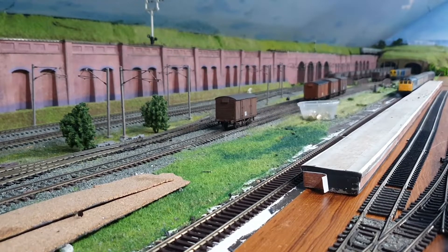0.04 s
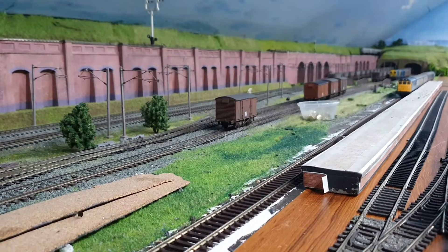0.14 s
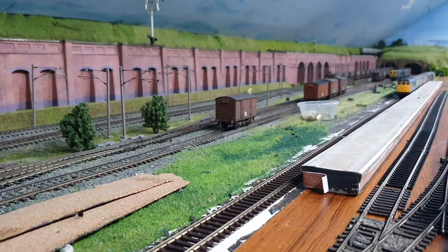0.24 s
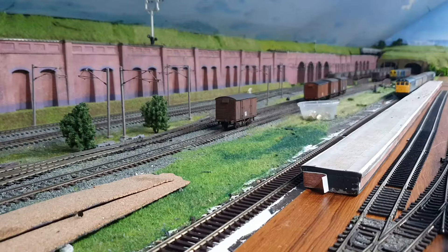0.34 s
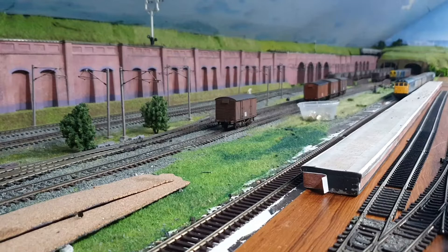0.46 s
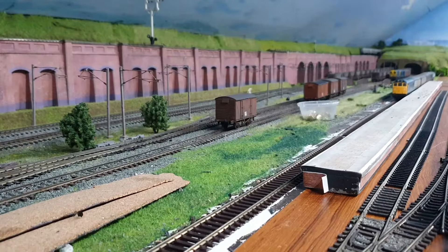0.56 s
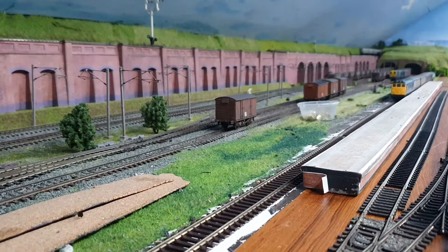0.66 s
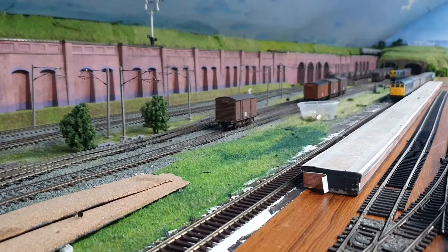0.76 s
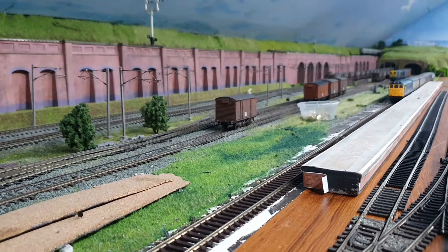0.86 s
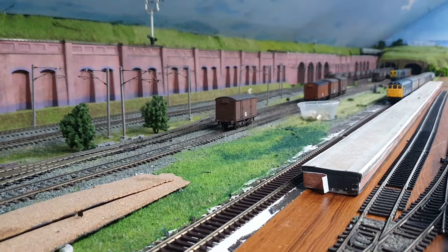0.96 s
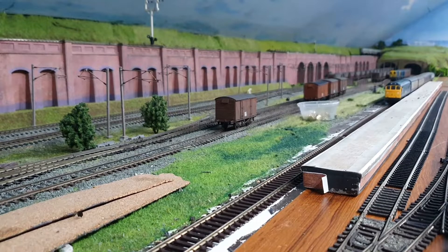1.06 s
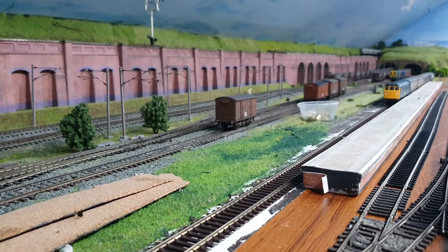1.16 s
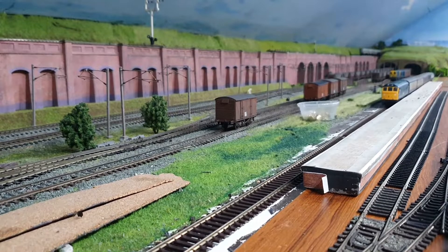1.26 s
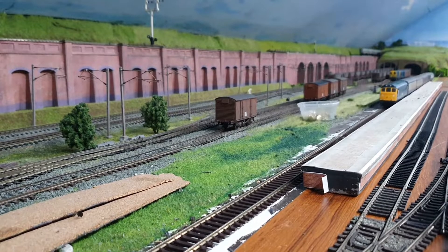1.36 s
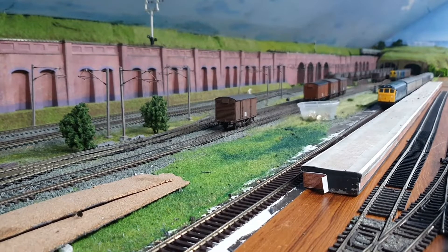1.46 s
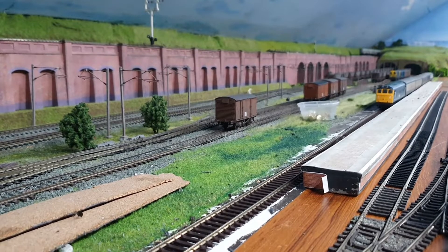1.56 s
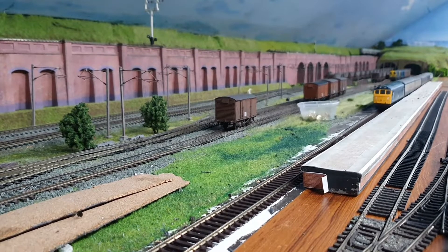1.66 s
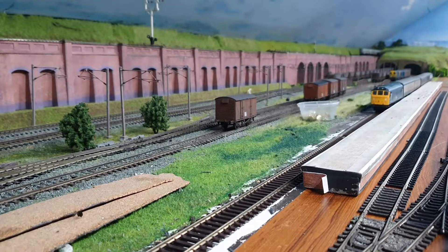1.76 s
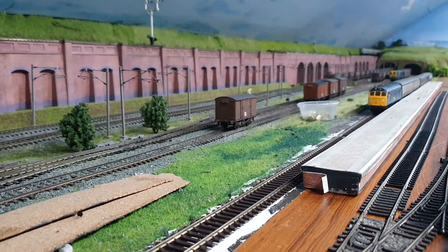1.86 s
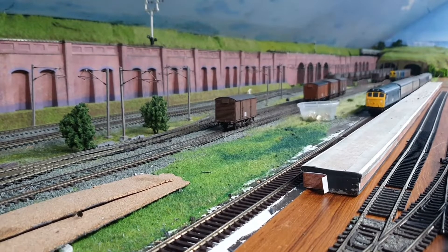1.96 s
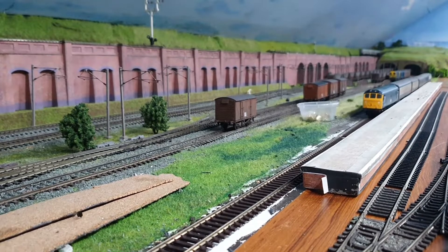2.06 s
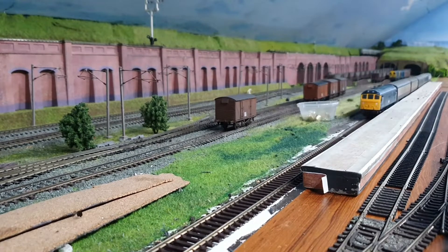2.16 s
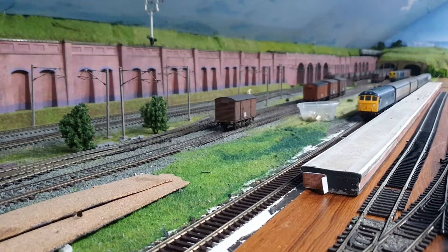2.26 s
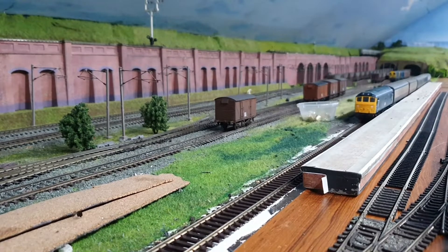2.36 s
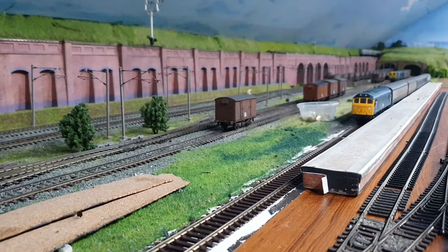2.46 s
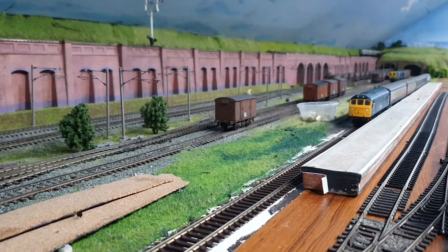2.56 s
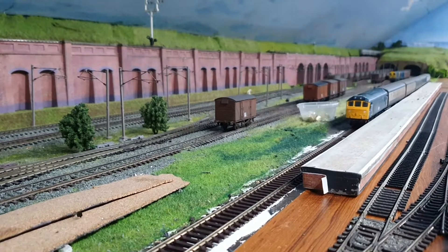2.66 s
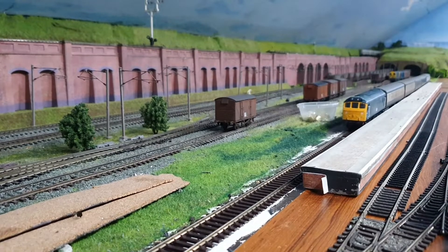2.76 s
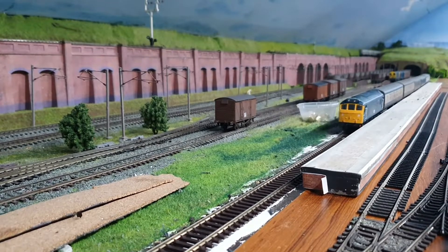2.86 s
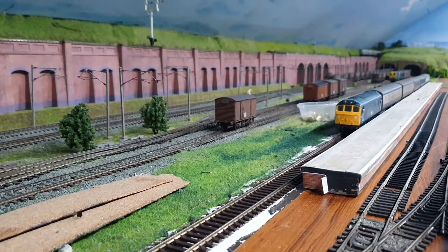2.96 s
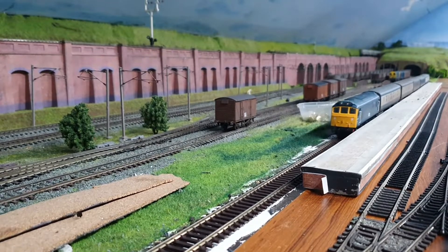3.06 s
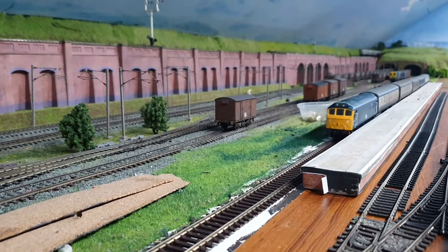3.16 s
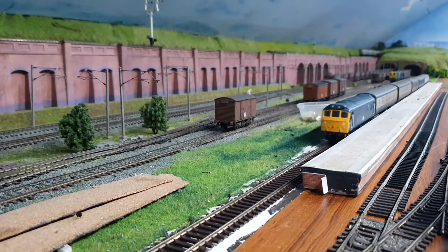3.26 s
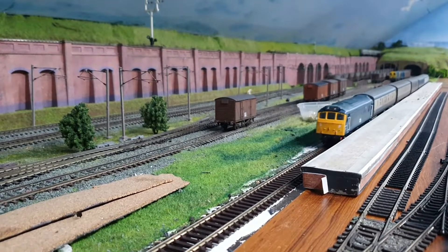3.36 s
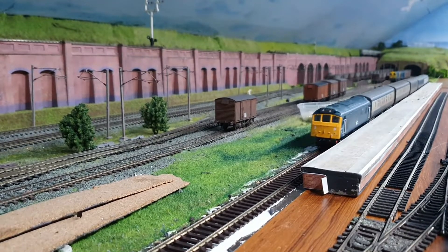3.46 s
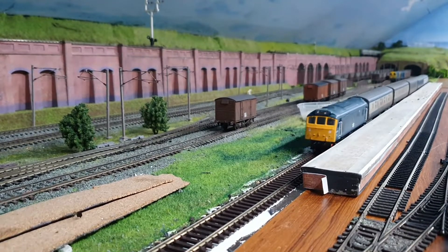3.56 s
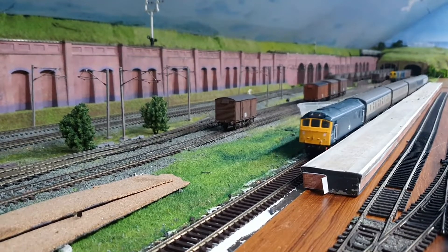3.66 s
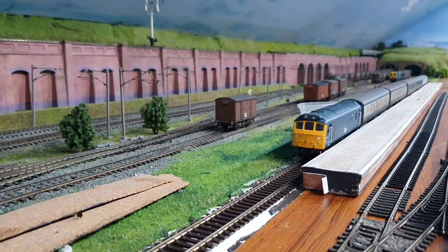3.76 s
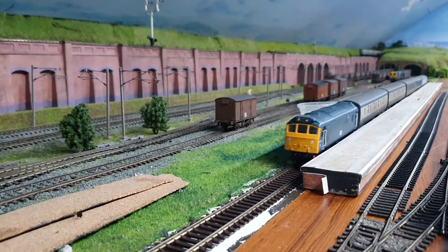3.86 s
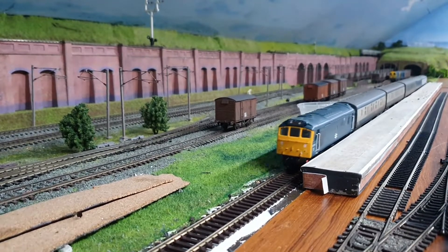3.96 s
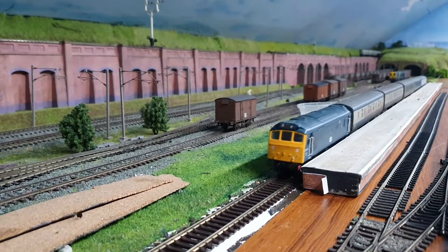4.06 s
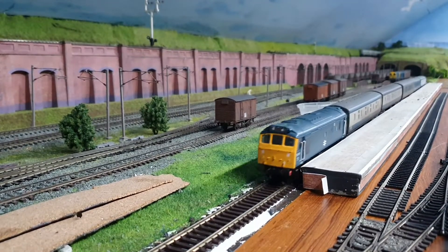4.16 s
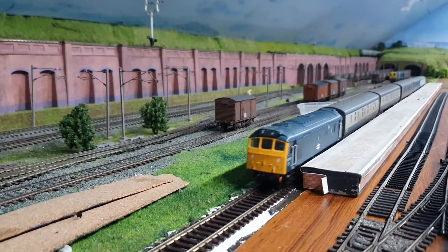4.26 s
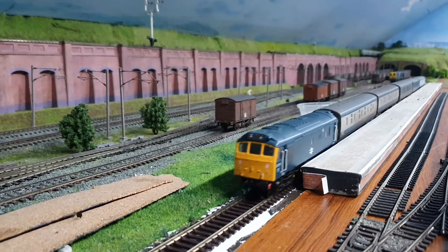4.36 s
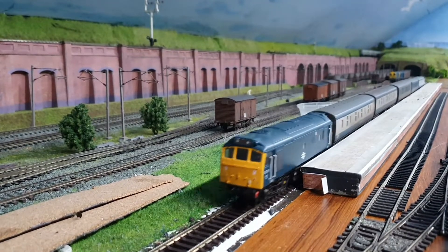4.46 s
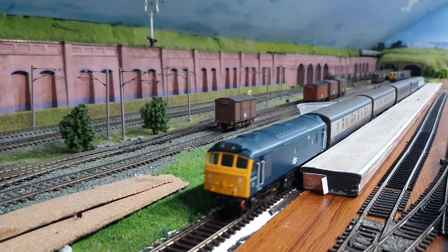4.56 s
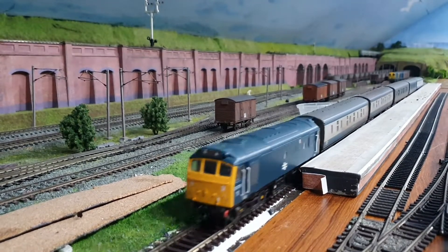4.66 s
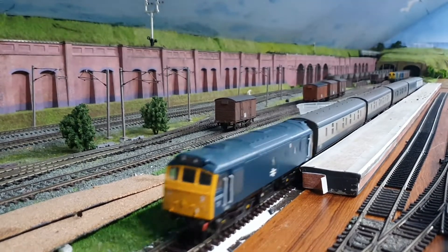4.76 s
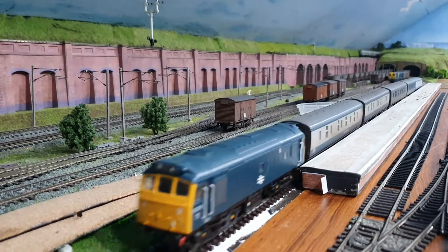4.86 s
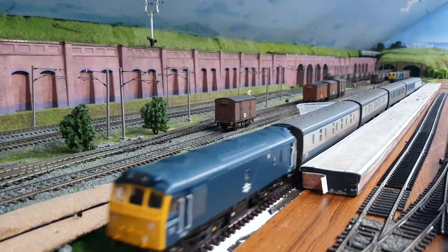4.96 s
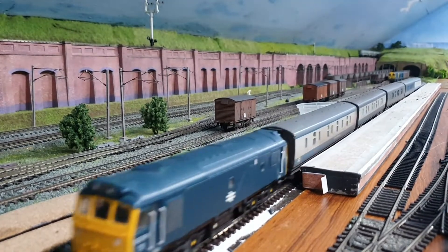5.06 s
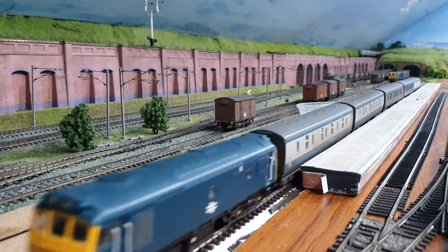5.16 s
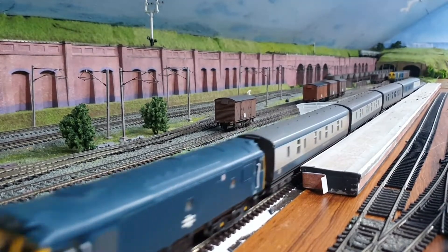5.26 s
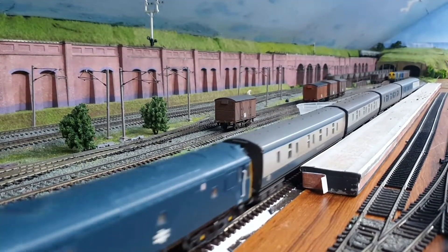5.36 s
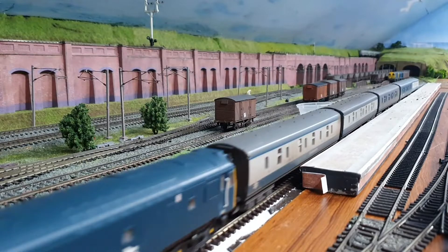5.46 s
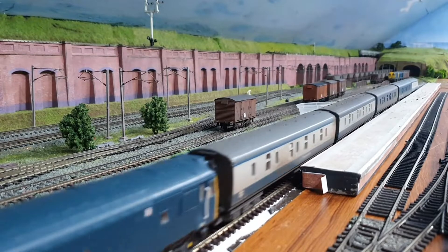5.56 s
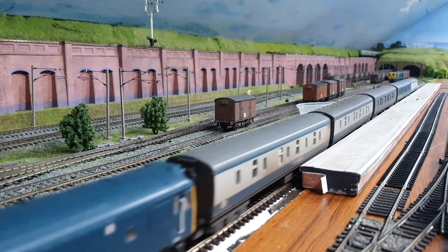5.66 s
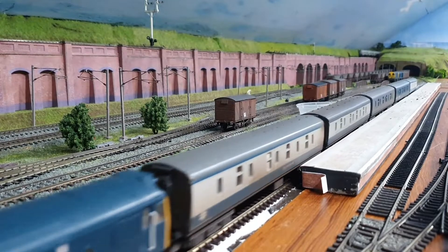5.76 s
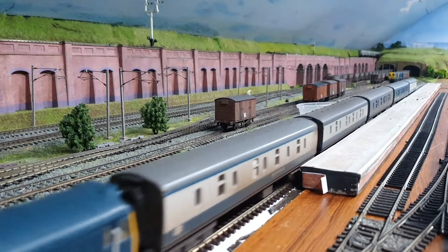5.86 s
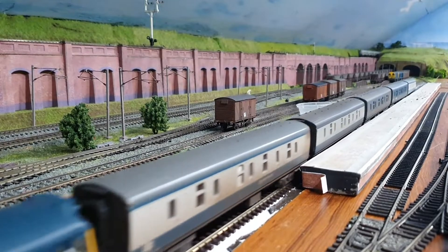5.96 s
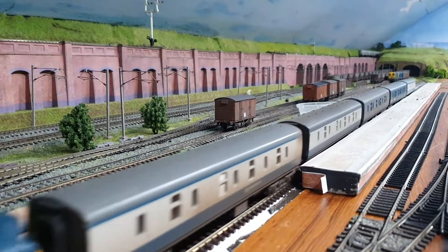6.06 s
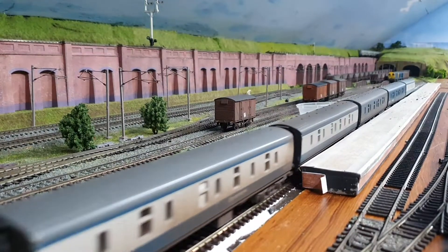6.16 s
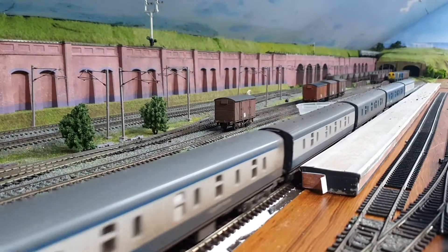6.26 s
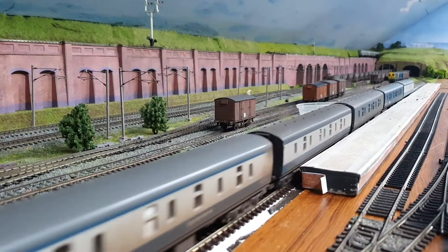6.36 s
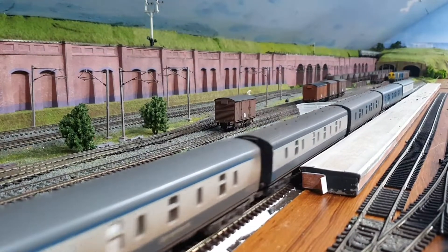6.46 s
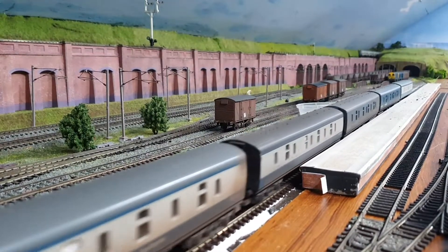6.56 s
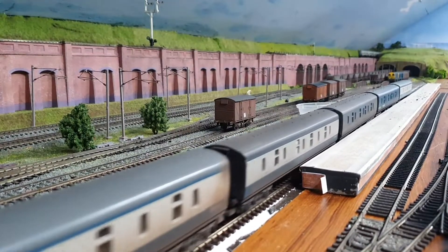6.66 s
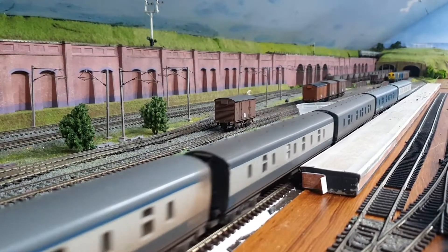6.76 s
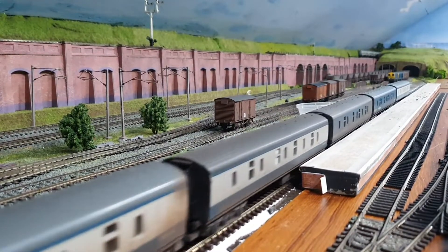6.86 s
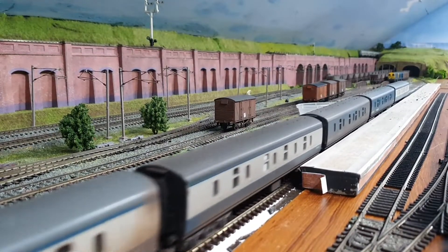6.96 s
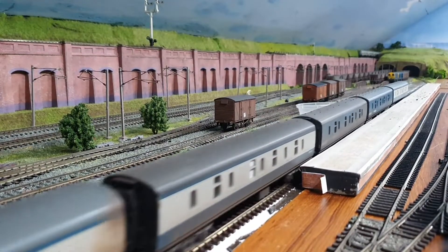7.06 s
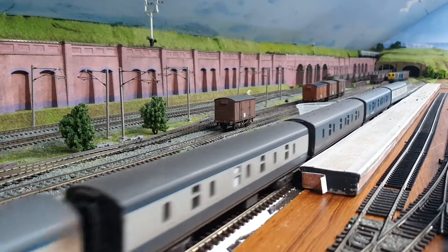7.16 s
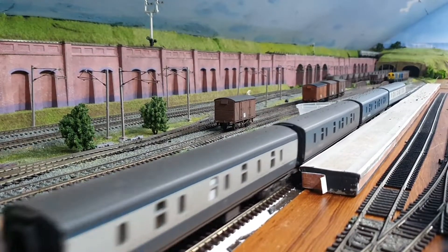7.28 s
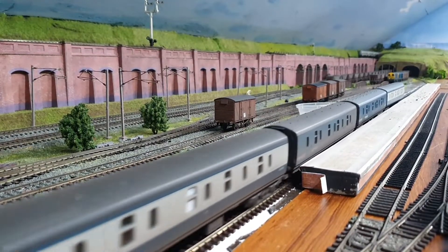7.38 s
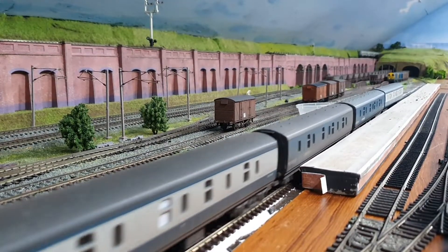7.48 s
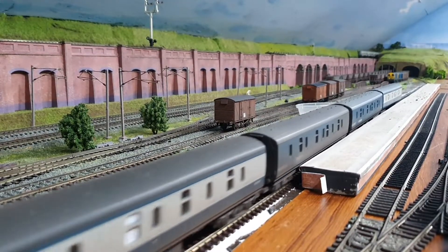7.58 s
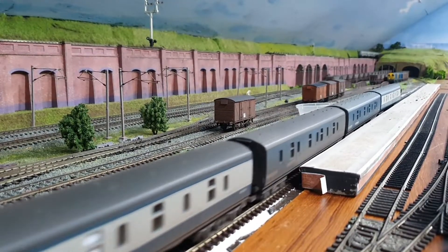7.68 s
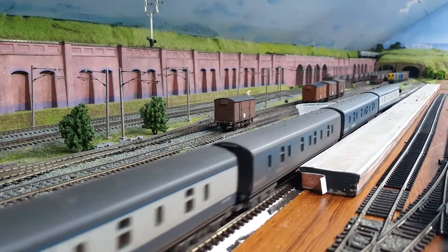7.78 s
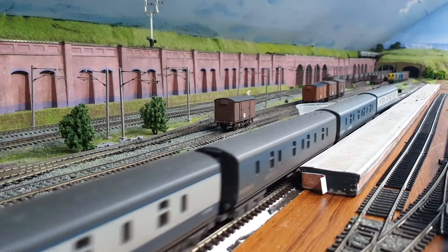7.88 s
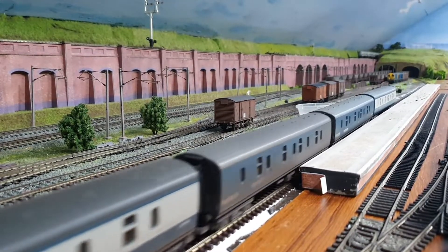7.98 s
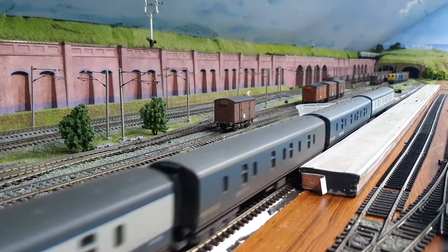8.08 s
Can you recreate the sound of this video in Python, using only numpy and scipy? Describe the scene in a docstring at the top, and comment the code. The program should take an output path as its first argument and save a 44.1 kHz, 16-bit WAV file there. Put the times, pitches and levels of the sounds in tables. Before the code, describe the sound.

A model diesel locomotive pulls coaches along a wooden baseboard in a small, short-echoed room, heard in stereo from beside the track. From 0 to 2 s it is distant: a blurred, steady gear rattle, about forty-six quick bursts per second limping in pairs, with a nasal motor whine and faint low rumble. From 2 to 4 s it grows clearer and louder; soft low thumps come through the board around 3 to 3.7 s, with a few hard clacks and a brief bright tone sliding downward near 3.7 s. Between 4.6 and 6.6 s it passes close, harsh and buzzing, with clusters of plastic clacks near 5.1 and 6.1 s, a throbbing low knock and a sweeping, hollow colour. After 6.5 s the drive weakens while coach wheels roll by with grainy clatter, fine hiss and tiny metallic ticks, still passing at 8 s.

```python
"""A wooden baseboard in a small room: a model diesel locomotive pulls coaches along it, from the far end
to just left of the microphone. Its gears rattle in six noise bursts per axle turn and ring the plastic body.
Filtered noise makes the board's rumble, rolling wheels and rail hiss; short bursts make ticks, clacks and
thumps. The room's echo wraps the far train; close by, a reflection with a moving delay sweeps the tone."""
import sys
import numpy as np
from scipy import signal
from scipy.fft import rfft, irfft
from scipy.io import wavfile
from scipy.ndimage import uniform_filter1d, map_coordinates

SR = 44100
rng = np.random.default_rng(int(sys.argv[2]) if len(sys.argv) > 2 else 0)


def unload_audio(sound):
    """Save the sound as a 16-bit wav file, at the path given as the first command line argument."""
    columns = np.transpose(np.atleast_2d(sound))
    # keep every value between -1 and 1, then stretch to whole-number steps
    steps = np.round(np.clip(columns, -1, 1) * 32767)
    wavfile.write(sys.argv[1], SR, steps.astype(np.int16))


N = 358091
TIME = np.arange(N) / SR


def gain_of(db):
    """Decibels to amplitude."""
    return 10 ** (np.asarray(db) / 20)


def size_of(seconds):
    """Seconds to samples."""
    return int(seconds * SR)


def unit_rms(x):
    """Scales to rms 1."""
    return x / np.sqrt(np.mean(x ** 2) + 1e-20)


def read_spectrum(points, hz):
    """Interpolates a spectrum on a log-frequency axis."""
    f, value = np.transpose(points)
    return np.interp(np.log(hz + 1), np.log(f + 1), value)


def follow(rows, t=TIME):
    """Interpolates each column of a curve at the times t."""
    s, *columns = np.transpose(rows)
    return [np.interp(t, s, c) for c in columns]


def add(mix, s, sound):
    """Adds a sound at s seconds, in place."""
    part = mix[max(round(s * SR), 0):][:len(sound)]
    part += sound[:len(part)]


def colour(x, points, modes=(), size=8192):
    """Minimum-phase filter: a broad spectrum with resonances standing on it; output at rms 1."""
    hz = abs(np.fft.fftfreq(size, 1 / SR))
    db = read_spectrum(points, hz)
    for centre_hz, width_hz, lift_db in modes:
        db = db + lift_db / (1 + (2 * (hz - centre_hz) / width_hz) ** 2)
    log_spectrum = np.conj(signal.hilbert(db * np.log(10) / 20))
    impulse = np.fft.ifft(np.exp(log_spectrum)).real
    return unit_rms(signal.oaconvolve(x, impulse[:size // 2])[:N])


def band(x, lo_hz, hi_hz, order=4):
    """Band-pass without delay."""
    sos = signal.butter(order, [lo_hz, hi_hz], "band", fs=SR, output="sos")
    return signal.sosfiltfilt(sos, x)


def lifted(x, hz, lift_db, width_hz):
    """Lifts a band whose centre follows hz: shift to 0 Hz, low-pass, shift back, add."""
    turn = np.exp(2j * np.pi * np.cumsum(hz) / SR)
    pole = np.exp(-np.pi * width_hz / SR)
    picked = 2 * (turn * signal.lfilter([1 - pole], [1, -pole], x / turn)).real
    return x + (gain_of(lift_db) - 1) * picked


def wander(hz):
    """Random drift: noise under a Gaussian low-pass, rms 1."""
    lowpass = np.exp(-(np.fft.rfftfreq(N, 1 / SR) / hz) ** 2)
    return unit_rms(irfft(rfft(rng.standard_normal(N)) * lowpass, N))


def grains(per_s):
    """Tiny impacts of random size at random moments."""
    return unit_rms(rng.standard_normal(N) * (rng.random(N) < per_s / SR))


def passing(at_s, spread_s, t=TIME):
    """Inverse-square swell of something passing at a steady speed: 1 when closest, 0 far away."""
    return 1 / (1 + ((t - at_s) / spread_s) ** 2)


# decay of the room: (frequency [Hz], t60 [s])
ROOM_DECAY = [(200, .22), (1000, .16), (2200, .1), (4000, .06), (12000, .04)]


def room(port_delay_s=0.00045, start_s=0.00273):
    """Decaying noise response at two close ports: alike in the bass, unrelated in the treble."""
    half_s = SR // 2
    taps = rng.standard_normal((2, half_s)) * (TIME[:half_s] > start_s)
    hz, t, z = signal.stft(taps, SR, nperseg=256)
    same = np.sinc(2 * hz * port_delay_s)[:, None]
    second = same * z[0] + np.sqrt(1 - same ** 2) * z[1]
    decay = gain_of(-60 * t / read_spectrum(ROOM_DECAY, hz)[:, None])
    tail = signal.istft(np.array([z[0], second]) * decay, SR)[1]
    return tail / np.linalg.norm(tail[0])


def reverberate(x, count=13):
    """Each stretch of track excites the room in its own way; the responses crossfade."""
    stretch, out = np.linspace(0, count - 1, N), np.zeros((2, N))
    for k in range(count):
        on = np.flatnonzero(abs(stretch - k) < 1)
        faded = x[on] * np.cos(np.pi / 2 * (stretch[on] - k))
        echo = signal.oaconvolve(faded[None], room(), axes=1)
        for ear, sound in zip(out, echo):
            add(ear, on[0] / SR, sound)
    return out


# the locomotive's place: (time [s], nearness [0-1], lead of the left ear in the mid range [ms])
PATH = [(0, 0.26, 0.053), (2, 0.4, 0.097), (3.5, 0.38, 0.2), (5.05, 0.57, 0.2), (5.5, 0.59, 0.62),
        (6.1, 1, .48), (7, 0.84, 0.47), (8.12, 0.83, 0.2)]
# change of colour from far to near: (frequency [Hz], level [dB])
NEAR_COLOUR_DB = [(220, -1), (300, 10), (430, -3.5), (580, -8), (700, -3.5), (860, 2), (1000, 0),
                  (1300, -9), (1800, -5.5), (2250, -7), (2700, -1), (4000, -2.5), (9000, 4), (14000, 3)]
# left minus right, far and near: (frequency [Hz], difference [dB])
FAR_BALANCE_DB = [(200, -35), (380, -6.5), (700, -6), (1290, -4.5), (2380, -2.5), (4400, -8.5), (6100, -4),
                  (7300, -28), (8500, -16), (15000, -6)]
NEAR_BALANCE_DB = [(200, 6), (380, 4), (700, -2.5), (1290, -3.5), (2380, -13.5), (4400, 3.5), (6200, 10),
                   (7300, -10.5), (8500, 18), (15000, 10)]
# wall reflection: delay far and longest, time of the longest, spread
WALL_FAR_MS, WALL_NEAR_MS, WALL_AT_S, WALL_SPREAD_S = 1.026, 2.55, 5.746, 1.94


def place(x, far_wet_db=2, near_wet_db=-6, wall=0.45, shelf=0.02, shelf_ratio=1.8,
          scatter_hz=3200, low_drop_db=4):
    """Direct sound, two moving reflections and the room, whose share falls with nearness."""
    frames = dict(fs=SR, nperseg=1024, noverlap=768)
    hz, t, dry = signal.stft(x, **frames)
    wet = signal.stft(reverberate(x), **frames)[2]
    hz = hz[:, None]
    near, lead_ms = follow(PATH, t)
    wall_ms = WALL_FAR_MS + (WALL_NEAR_MS - WALL_FAR_MS) * passing(WALL_AT_S, WALL_SPREAD_S, t)
    per_ms = -2j * np.pi * hz / 1000  # phase of a 1 ms delay
    side = np.array([1, -1])[:, None, None] / 2
    # the whole board radiates the low notes, so only higher ones point to the train
    ear_ms = side * lead_ms * hz ** 2 / (hz ** 2 + 330 ** 2)
    ear_ms = ear_ms / (1 + (hz / 5500) ** 8)
    # the scenery mirrors low notes and scatters the treble
    mirror = 1 / (1 + (hz / scatter_hz) ** 4)
    direct = np.exp(-per_ms * ear_ms) * (1 + mirror * wall * np.exp(per_ms * wall_ms))
    direct = direct + mirror * shelf * np.exp(per_ms * (shelf_ratio * wall_ms + ear_ms))
    # close by, the mirrored low notes lose low_drop_db more room
    wetness = gain_of(far_wet_db + near * (near_wet_db - far_wet_db - low_drop_db * mirror))
    mixed = (direct * dry + wetness * wet) / np.sqrt(1 + wetness ** 2)
    far_balance_db = (1 - near) * read_spectrum(FAR_BALANCE_DB, hz)
    balance_db = far_balance_db + near * read_spectrum(NEAR_BALANCE_DB, hz)
    mixed = mixed * gain_of(side * balance_db + near * read_spectrum(NEAR_COLOUR_DB, hz))
    return signal.istft(mixed, **frames)[1][:, :N]


# wheels bump over the track: (time [s], peak before the ear balance [dB], frequency [Hz])
THUMPS = [(3.01, -42, 58.6), (3.18, -37.5, 156), (3.49, -30.5, 66), (3.658, -37, 176), (4.29, -36, 70.7),
          (5.603, -52, 46.7), (5.89, -44, 50), (8.009, -40, 70.8)]


def thumps(rise_cycles=1.0):
    """A bump swells and dies within a few cycles of one low note of the board."""
    t, out = np.arange(size_of(.3)) / SR, np.zeros(N)
    for s, db, hz in THUMPS:
        age = t * hz / rise_cycles
        swell = (age / 2) ** 2 * np.exp(2 - age)
        add(out, s, gain_of(db) * swell * np.sin(2 * np.pi * (hz * t + rng.random())))
    return out


# drumming, before trims: (time [s], boom level [dB], thrum level [dB])
BOARD = [(0, -53, -51.5), (1.2, -55, -54), (1.9, -48, -52.5), (2.9, -48, -53), (4.2, -40.5, -47.5),
         (5.7, -45, -49.5), (6.8, -46, -52), (7.3, -47, -48), (8.12, -48, -46.5)]
# colours of the board: (frequency [Hz], relative level [dB])
BOOM_COLOUR = [(15, -41), (25, -24), (42, -10.5), (56, -6), (66, 0.5), (80, -8), (100, -15.5), (160, -55),
               (400, -106)]
THRUM_COLOUR = [(50, -59), (85, -1), (110, -1), (145, -6.5), (200, -7), (260, -15), (340, -11.5),
                (600, -53), (1500, -64)]
# hum of the motor's shake in the board, before the ear balance: (time [s], level [dB])
HUM = [(0, -54), (1.7, -56.5), (1.87, -44.5), (2.25, -54), (2.5, -45.5), (3.6, -44), (4.35, -44),
       (4.6, -53), (5.1, -45.5), (5.7, -48), (6.6, -50), (7.3, -58), (8.12, -57)]


def baseboard(boom_db=-6, thrum_db=0, hum_hz=69.9, waver_hz=0.797, octave_db=-9,
              drone_db=-45, drone_at_s=7.34, drone_spread_s=0.13):
    """The board booms under the wheels and hums with the motor's shake, whose octave swells briefly."""
    boom_level_db, thrum_level_db = follow(BOARD)
    shake = 2 * np.pi * np.cumsum(hum_hz + waver_hz * wander(4.37)) / SR
    octave = np.sin(2 * shake)
    hum = unit_rms(np.sin(shake) * gain_of(0.6 * wander(4.3)))
    boom = gain_of(boom_level_db + boom_db) * colour(rng.standard_normal(N), BOOM_COLOUR)
    low = boom + gain_of(follow(HUM)[0]) * hum + thumps()
    common = colour(rng.standard_normal(N), THRUM_COLOUR)
    common = unit_rms(common + gain_of(octave_db + 3.4 * wander(11.4)) * octave)
    # a weaker part, opposite in the two ears
    apart = colour(rng.standard_normal(N), THRUM_COLOUR) * np.array([[1], [-1]])
    thrum = gain_of(thrum_level_db + thrum_db) * (common + 0.35 * apart)
    drone = gain_of(drone_db) * passing(drone_at_s, drone_spread_s) * octave
    return low * gain_of([[-1.6], [1.4]]) + thrum * gain_of([[-.5], [.4]]) + drone


# drive level in three bands, before trims: (time [s], body [dB], rattle [dB], fizz [dB])
RUN = [(0, -43.5, -36, -43.5), (.7, -38.5, -32.5, -40), (2, -37, -33.5, -41), (2.5, -36.5, -29.5, -39.5),
       (2.9, -38.5, -31, -41), (3.501, -35, -27.5, -37.5), (4, -35, -30, -36.5), (4.5, -32.5, -24.5, -36.5),
       (4.899, -29, -26.5, -32.5), (5.298, -28, -31.5, -31.5), (5.75, -28.5, -27, -35.5),
       (6.05, -29, -24.5, -30.5), (6.7, -33, -29.5, -35), (7.25, -35.5, -28.5, -38),
       (7.65, -34, -34, -40.5), (8.12, -43.5, -36, -42)]
# colour of the fine hiss from the rails: (frequency [Hz], relative level [dB])
HISS_COLOUR = [(2000, -31), (4500, 9.5), (5400, 4.5), (6100, -5), (7200, -11), (8600, -7.5), (10500, -13.5),
               (12500, -21.5), (15000, -46)]


def rail_hiss(level_db=-15):
    """The whole train hisses from no one direction: unrelated noise per ear, at the drive's fizz level."""
    ears = np.array([colour(rng.standard_normal(N), HISS_COLOUR) for _ in range(2)])
    fizz_db = follow(RUN)[2]
    return ears * gain_of(fizz_db + level_db)


# rolling of the coach wheels: (time [s], relative level [dB])
COACHES = [(0, -47), (3, -44), (5, -38.5), (6.5, -35.5), (7.15, -32.5), (7.4, -31.5), (7.75, -28),
           (8.12, -29.5)]
# colour of the rolling wheels: (frequency [Hz], relative level [dB])
ROLL_COLOUR = [(200, -39), (290, -25.5), (340, -9), (450, -16.5), (560, -4.5), (680, 3), (800, 1.5),
               (1080, 3), (1300, 9), (1600, -2), (2100, -1), (3300, -14), (4100, -28), (6000, -26),
               (10000, -42.5), (15000, -62)]


def coaches(flutter_db=2.2, bright_hz=1450, bright_db=-2):
    """Wheels roll over the fine roughness of the rails; bogies add a light, grainy clatter."""
    roll = colour(grains(24000) * gain_of(flutter_db * wander(62)), ROLL_COLOUR)
    clatter = unit_rms(band(grains(2500), 0.78 * bright_hz, 1.223 * bright_hz, order=2))
    return (roll + gain_of(bright_db) * clatter) * gain_of(follow(COACHES)[0])


# wheels ticking on the rails: (time [s], relative level [dB])
TICKS = [(3.0265, -50), (3.66, -52), (4.709, -45), (4.86, -49), (5.888, -47), (6.348, -49), (6.4078, -48),
         (6.554, -47), (6.83, -49), (6.8961, -47), (6.9815, -46), (7.2908, -51), (7.433, -48), (7.602, -52),
         (7.917, -53), (8.0707, -50), (8.087, -45)]


def ticks(level_db=-4.5, decay_s=0.0032):
    """Metal wheels tick on the rails: bright noise that dies exponentially."""
    t, out = np.arange(size_of(.02)) / SR, np.zeros(N)
    for s, db in TICKS:
        noise = unit_rms(band(rng.standard_normal(len(t)), 4000, 12600))
        add(out, s, gain_of(db + level_db) * np.exp(-t / decay_s) * noise)
    return out


# gear teeth that catch and clack: (time [s], relative level [dB], ring [Hz])
CLACKS = [(3.343, -17, 2420), (3.4727, -13, 1980), (3.8212, -23, 4030), (3.996, -17.5, 2010),
          (4.037, -18, 1800), (4.6498, -20, 1810), (4.8517, -14, 1904), (5.039, -11, 1950),
          (5.0835, -20, 1900), (5.1265, -12, 1950), (5.1693, -19, 4290), (5.2145, -15, 2170),
          (5.299, -7.5, 4320), (5.3426, -15.5, 2130), (5.994, -11, 1990), (6.001, -7.5, 2080),
          (6.086, -14, 2360), (6.109, -11, 4250), (6.124, -12.5, 4250), (6.2175, -6.5, 2055),
          (6.2407, -19, 1900), (6.4762, -13, 2156), (6.5493, -17, 2200), (6.6101, -16, 2150),
          (6.7852, -17, 1860), (7.331, -14.5, 2250), (7.3763, -22, 2130), (7.481, -19, 2210)]


def clacks(level_db=-1, rise_s=0.0011, width_hz=300, chatter_db=-26):
    """A catching tooth chatters for a few milliseconds and rings one resonance of the shell."""
    t, out = np.arange(size_of(0.048)) / SR, np.zeros(N)
    swell = (t / rise_s / 2) ** 2 * np.exp(2 - t / rise_s)
    for s, db, hz in CLACKS:
        chatter, slip = rng.standard_normal((2, len(t)))
        # random phase drift widens the ring
        drift = np.cumsum(slip) * np.sqrt(np.pi * width_hz / SR)
        ringing = np.sin(2 * np.pi * hz * t + drift)
        chatter = gain_of(chatter_db) * unit_rms(band(chatter, 600, 4600))
        add(out, s, gain_of(db + level_db) * swell * (ringing + chatter))
    return band(out, 400, 5840, order=3)


AXLE_TURNS_PER_S, AXLE_START_TURNS = 7.6539, .0468


def axle(t=TIME):
    """Turns of the driven axle so far, at a steady rate."""
    return AXLE_START_TURNS + AXLE_TURNS_PER_S * t


# knocks of the drive, one set per turn: (place in the turn [0-1], ring [Hz], relative level [dB])
KNOCKS = [(.117, 448, -1), (.46, 434, -5), (0.5, 418, -11), (.783, 432, -0.5), (.925, 414, -6),
          (.3, 645, -1), (.658, 603, -6), (.445, 860, 0.5), (.917, 880, -10.5)]
# level of the knocks, before the ear balance: (time [s], level [dB])
KNOCKING = [(0, -58), (2, -51), (3.5, -41.5), (5, -38), (6.3, -42.5), (7.2, -52.5), (8.12, -49)]
# play in the drive: scatter of each knock in time and in pitch
KNOCK_PLAY_S, KNOCK_DETUNE_SHARE = .00025, .035


def knocks(length_s=0.02, balance_db=-2.0, uneven_db=1.5):
    """Low knocks swell and die nearly in step with the axle: a soft throb, nearly alike in both ears."""
    t, out = np.arange(-length_s / 2, length_s / 2, 1 / SR), np.zeros(N)
    swell = np.cos(np.pi * t / length_s) ** 2
    for turn in range(int(axle()[-1]) + 1):
        for at, hz, db in KNOCKS:
            late, detune, louder = rng.standard_normal(3)
            knock = swell * np.sin(2 * np.pi * hz * (1 + KNOCK_DETUNE_SHARE * detune) * t)
            s = (turn + at - AXLE_START_TURNS) / AXLE_TURNS_PER_S + t[0] + KNOCK_PLAY_S * late
            add(out, s, gain_of(db + uneven_db * louder) * knock)
    ears_db = balance_db * np.array([[.5], [-.5]])
    return unit_rms(out) * gain_of(follow(KNOCKING)[0] + ears_db)


# the gear bursts of one turn, in order: (mean strength [dB])
BURST_DB = [3.5, 0, 1.5, 0, 4.5, 2.6]


def beats(t=TIME, lead=0.0594, swing=0.103):
    """Count of gear bursts so far; they limp in pairs, one early and the next late."""
    even = axle(t) * len(BURST_DB)
    return even + lead + swing * np.cos(np.pi * even)


# broad colour of the drive: (frequency [Hz], relative level [dB])
DRIVE_COLOUR = [(200, -30.5), (300, -23.5), (365, -21.5), (410, -8.5), (500, -6.5), (560, -3.5),
                (700, -5.5), (1100, -10), (1650, 4.5), (2400, -0.5), (3000, -8), (3700, -4.5),
                (4800, -13.5), (6000, -23.5), (8000, -33.5), (11000, -54.5), (15000, -67)]
# resonances of the body shell and chassis: (centre [Hz], width [Hz], lift [dB])
SHELL_MODES = [(717, 520, 2), (917, 110, 5), (1053, 103, 7), (1904, 420, 7.5), (2198, 200, 6.5),
               (2870, 260, -2), (3395, 200, 4), (4004, 1150, 4), (5430, 1280, 10), (6710, 590, 8.5),
               (8750, 220, 9.5)]


def gears(sharpness=2, far_bed=1.0, near_bed=0.44, repeat=0.082, uneven_db=0.73,
          stagger_beats=0.038, whirr_db=-10, count=5760):
    """Tooth impacts crowd into bursts; worn teeth repeat part of their pattern on every turn."""
    near = follow(PATH)[0]
    beat = beats() + stagger_beats * wander(33)
    which = np.round(beat).astype(int)
    uneven = uneven_db * rng.standard_normal(size=512)[which]
    strength = gain_of(np.take(BURST_DB, which, mode="wrap") + uneven)
    bed = np.interp(near, [.15, .6], [far_bed, near_bed])  # from afar the bursts run together
    pressure = bed + strength * abs(np.cos(np.pi * beat)) ** (2 * sharpness)
    # the same teeth meet once a turn, and the pinion's own teeth three times a turn
    tooth = (axle() * count).astype(int)
    wheel, pinion = rng.standard_normal((2, count))
    worn = unit_rms(wheel[tooth % count] + .6 * pinion[tooth % (2 * count // len(BURST_DB))])
    impacts = np.sqrt(repeat) * worn + np.sqrt(1 - repeat) * grains(20000)
    rattle = unit_rms(pressure * impacts)
    # between the bursts the shaft keeps up a lower, even whirr
    whirr = band(.5 * worn[::-1] + rng.standard_normal(N), 210, 1700, order=2)
    return colour(rattle + gain_of(whirr_db) * whirr, DRIVE_COLOUR, SHELL_MODES)


def tooth_colours(x, depth_db=1.5, spread_hz=520):
    """Every burst strikes the shell a little differently, so each has its own uneven spectrum."""
    frames = dict(fs=SR, nperseg=256, noverlap=192)
    hz, t, z = signal.stft(x, **frames)
    burst = np.round(beats(t)).astype(int)
    knots = rng.standard_normal((512, 128))
    rows, columns = np.meshgrid(burst, hz / spread_hz)
    patches = map_coordinates(knots, [rows, columns], order=1, mode="nearest")
    patches = patches * np.minimum(hz / 2000, 1.4)[:, None]  # the high modes vary most
    return signal.istft(z * gain_of(depth_db * patches), **frames)[1][:N]


SWEEP_HZ, SWEEP_SLIDE_HZ, SWEEP_WIDTH_HZ = 4030, 350, 180  # slide: either way
SWEEP_DB, SWEEP_AT_S, SWEEP_SPREAD_S = 14, 3.7, 0.2


def platform_sweep(x):
    """A short reflection near the platform's end sweeps a narrow bright band of the rattle downward."""
    slide = np.tanh(2 * (TIME - SWEEP_AT_S) / SWEEP_SPREAD_S)
    lift_db = SWEEP_DB * passing(SWEEP_AT_S, SWEEP_SPREAD_S)
    return lifted(x, SWEEP_HZ - SWEEP_SLIDE_HZ * slide, lift_db, SWEEP_WIDTH_HZ)


def ring(hz, level_db, width_hz, uneven_db, sharpness=2.1):
    """At the height of each burst a loose part rings briefly, at a slightly different pitch each time."""
    beat = beats()
    which = np.round(beat).astype(int)
    uneven = uneven_db * np.clip(rng.standard_normal(size=512), -2, 1.5)[which]
    strength = gain_of(np.take(BURST_DB, which, mode="wrap") + uneven)
    hz = hz + width_hz * (rng.standard_normal(size=512)[which] + wander(153.4))
    burst = strength * abs(np.cos(np.pi * beat)) ** (2 * sharpness)
    return gain_of(level_db) * unit_rms(burst * np.sin(2 * np.pi * np.cumsum(hz) / SR))


# loose parts along the track, relative levels:
# (time [s], shell [Hz], shell level [dB], metal [Hz], metal level [dB])
BUZZ = [(0, 1900, -13, 3950, -17), (.6, 2174, 1, 4000, -5), (1.4, 1668, -9, 3980, -23),
        (2.1, 1800, -9, 4150, -4), (2.6, 1980, -5, 3850, -12), (3.3, 2390, -5, 4330, -15),
        (3.62, 1893, -11, 4320, -13), (3.8, 1853, -10, 3790, -10), (4, 1950, -7, 3640, -19),
        (4.2, 1947, -7, 4130, -9), (4.8, 1946, 2, 4004, -7.5), (5.2, 1880, -1, 4166, -11),
        (5.6, 1723, -8, 4180, -19), (6.1, 2062, -12, 4290, -10), (6.6, 2132, -2.5, 3960, -24),
        (7.3, 2259, 0, 4150, -5), (8.12, 2427, -15, 4050, -7)]


def chassis():
    """The loose shell and the metal of the chassis buzz in step with the bursts."""
    shell_hz, shell_db, metal_hz, metal_db = follow(BUZZ)
    shell = ring(shell_hz, shell_db, width_hz=110, uneven_db=4.5)
    return shell + ring(metal_hz, metal_db, width_hz=170, uneven_db=1.5)


# the motor's whine, a resonance that sinks and rises: (time [s], centre [Hz], lift [dB])
WHINE = [(0, 1070, 9), (1.2, 953, 8), (1.9, 900, 7.5), (2.5, 808, 5), (3.1, 810, 0), (3.7, 960, 2.5),
         (4.3, 940, 3.5), (4.9, 877, 9.5), (5.4, 840, 8.5), (6.25, 873, 8), (6.9, 930, 4), (8.12, 920, 2.5)]
# bands that the surroundings favour; each glides, and swells or dips along one stretch of track:
# (far [Hz], near [Hz], width [Hz], lift [dB], swell [dB], swell time [s], swell spread [s])
FAVOURED = [(1347, 1250, 80, 2.5, 14, 7, 0.87), (2280, 2300, 140, 2, 5, 1.2, 0.45),
            (4390, 3500, 990, 2, -18, 3.93, 0.2), (1410, 1203, 190, 2.5, 10.5, 5.7, 0.37),
            (2800, 1697, 130, 2, 16, 5.35, 0.56), (3170, 2210, 280, 6, 7, 7.65, 0.91),
            (3880, 4400, 240, 3, 19, 7.99, 0.16), (5070, 7800, 1400, 1.5, 6, 4.57, 0.98),
            (6350, 5960, 750, 0, -21, 5.82, 0.39), (8450, 8400, 330, 1.5, 7.5, 5.92, 0.24),
            (650, 530, 80, 0, 6, 0.53, .7), (1640, 1500, 61, 1, 5, 1.4, 0.32),
            (1340, 1200, 80, 0.5, 6.5, 2.8, .4), (300, 300, 56, 0, 9, 5.47, 0.52),
            (7600, 7200, 1300, -0.5, 8, 6.9, 0.3)]
# the glide reaches its near end at PASS_S
PASS_S, PASS_SPREAD_S = 5.76, 1.35


def locomotive(body_db=0.04, rattle_db=-3.0, fizz_db=0.79, whine_width_hz=125):
    """The drive's colour glides as it passes; its low, middle and high voice swell each in its own way."""
    sound = platform_sweep(tooth_colours(gears()))
    close = passing(PASS_S, PASS_SPREAD_S)
    sound = lifted(sound, *follow(WHINE), whine_width_hz)
    for far_hz, near_hz, width_hz, lift_db, swell_db, at_s, spread_s in FAVOURED:
        hz = far_hz + (near_hz - far_hz) * close
        sound = lifted(sound, hz, lift_db + swell_db * passing(at_s, spread_s), width_hz)
    sound = place(sound + chassis())
    edges_hz = [(150, 1100), (1100, 3000), (3000, 20000)]
    out = 0
    for edge_hz, db, trim_db in zip(edges_hz, follow(RUN), (body_db, rattle_db, fizz_db)):
        part = band(sound, *edge_hz)
        # even out the slow level, then set it from the table
        power = uniform_filter1d((part ** 2).mean(0), size=17280)
        out = out + part / np.sqrt(abs(power) + 1e-12) * gain_of(db + trim_db)
    return out


def scene():
    """Baseboard, rails, wheels and locomotive in one room."""
    wheels_and_clacks = place(clacks() + ticks() + coaches())
    return baseboard() + rail_hiss() + wheels_and_clacks + knocks() + locomotive()


EDGE_HZ = 15650


def record(dry):
    """The recorder's band limit: a linear-phase low-pass."""
    lowpass = signal.firwin(511, EDGE_HZ, window=("kaiser", 9), fs=SR)
    return signal.oaconvolve(dry, lowpass[None], "same")


dry = scene()
out = record(dry)
unload_audio(out)
```